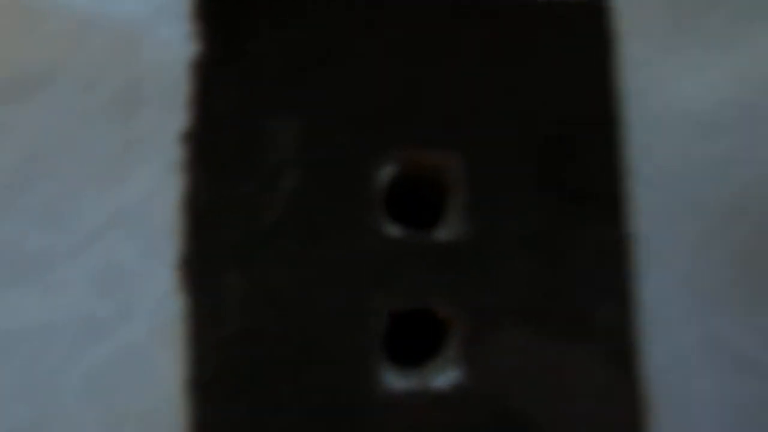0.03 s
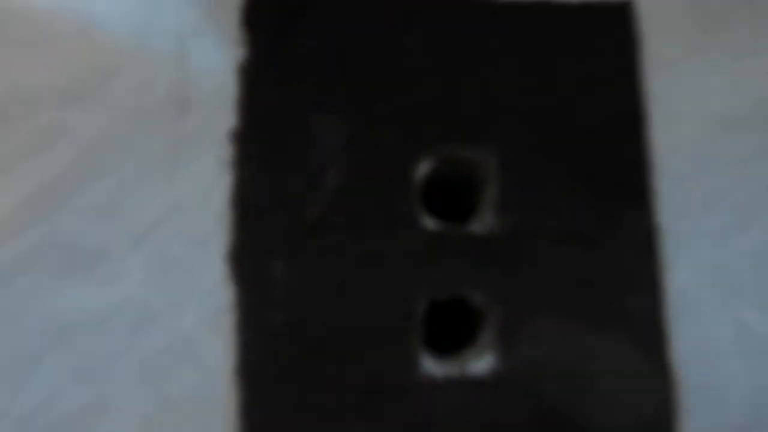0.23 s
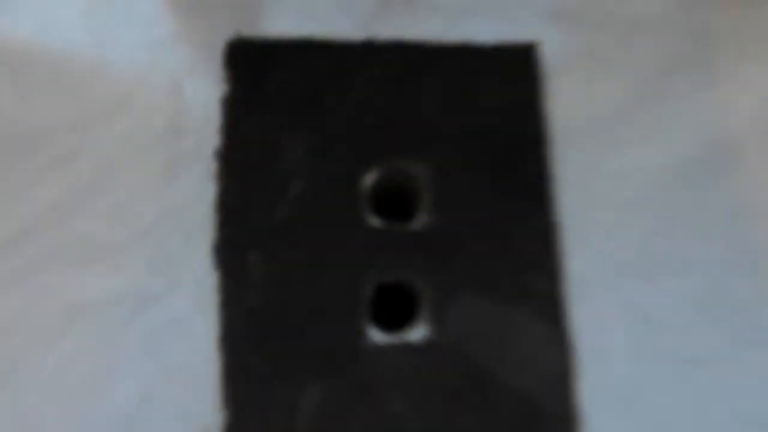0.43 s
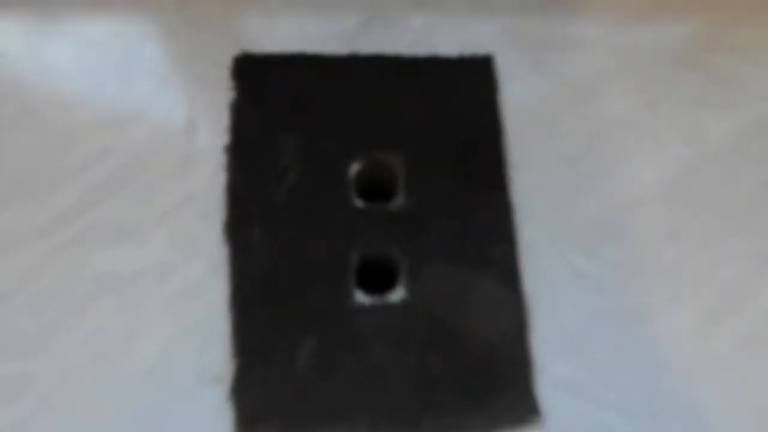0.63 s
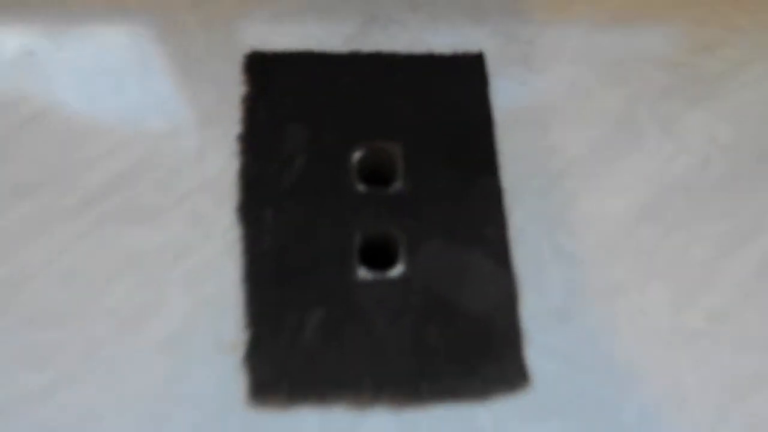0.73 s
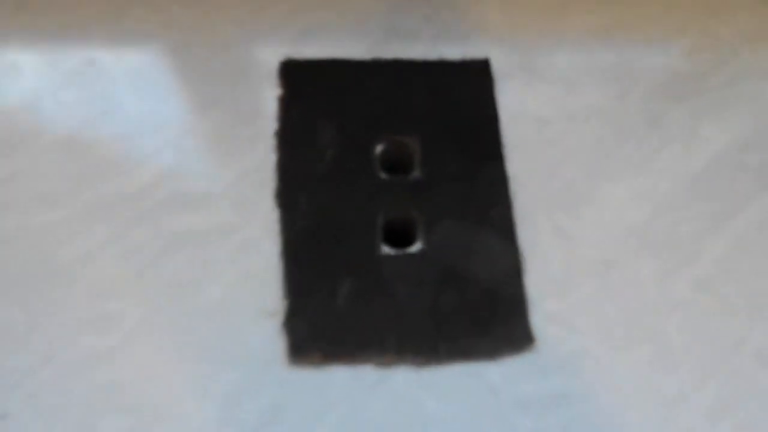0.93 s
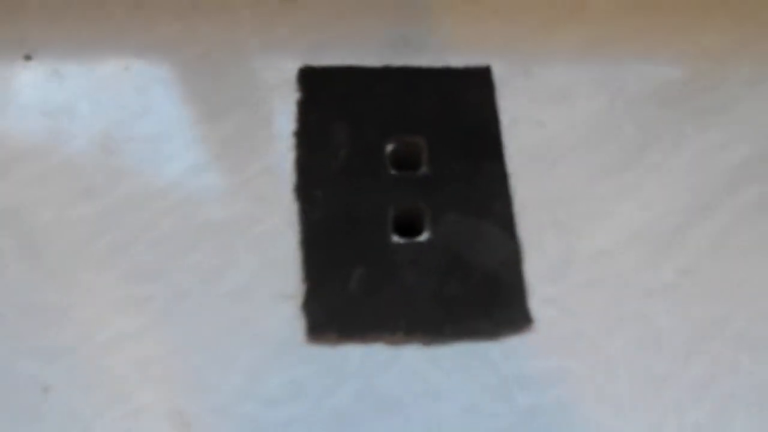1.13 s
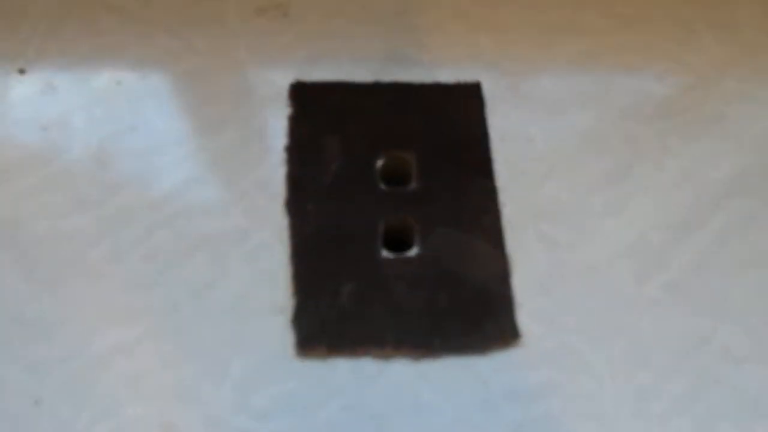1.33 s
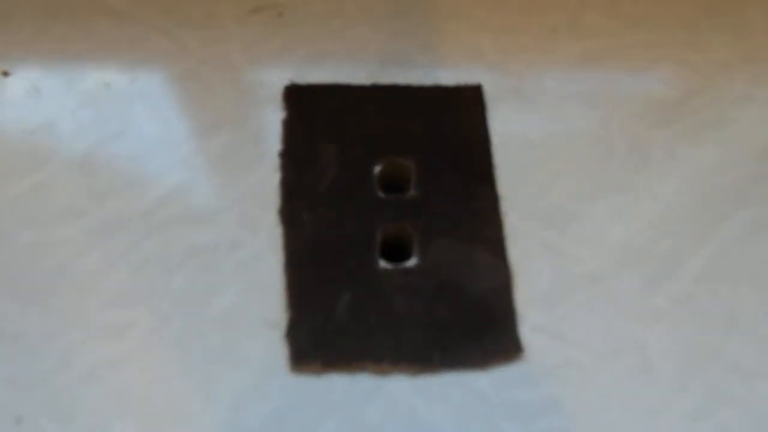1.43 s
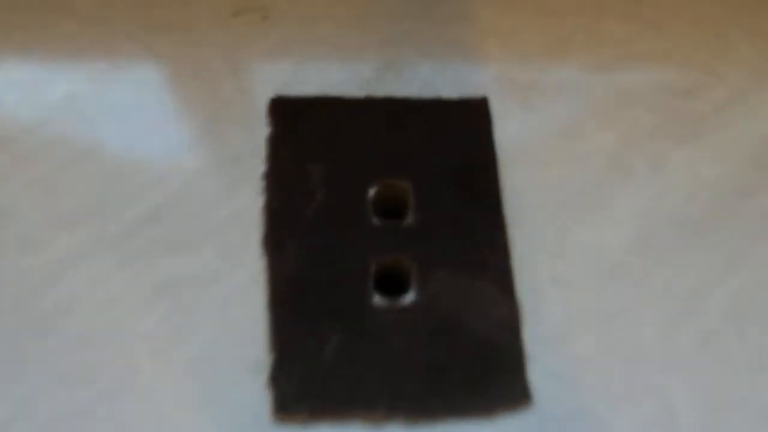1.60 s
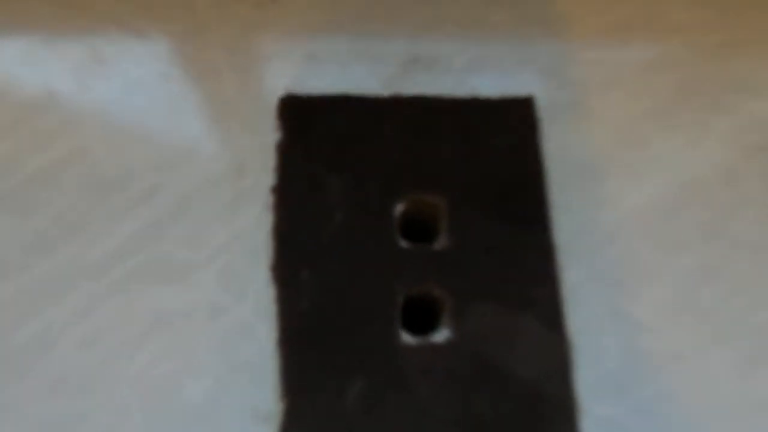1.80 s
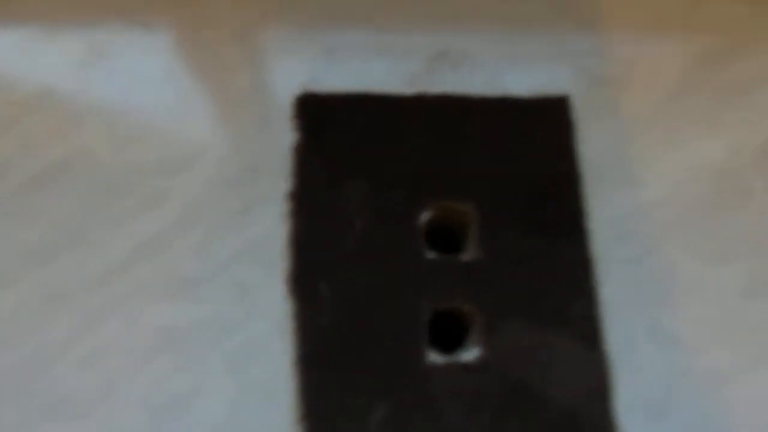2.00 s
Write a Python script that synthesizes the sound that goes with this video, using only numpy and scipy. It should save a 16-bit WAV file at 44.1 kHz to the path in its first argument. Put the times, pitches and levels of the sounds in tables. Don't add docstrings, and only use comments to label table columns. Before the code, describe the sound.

Bellows air rushes from a small hole, blasting roughly into a close stereo microphone mid-stroke

```python
import sys
import numpy as np
from scipy import signal
from scipy.fft import rfft, irfft
from scipy.io import wavfile
from scipy.ndimage import uniform_filter1d, minimum_filter1d

SR = 44100
rng = np.random.default_rng(int(sys.argv[2]) if len(sys.argv) > 2 else 0)


def dump(signal):
    limited = np.clip(np.atleast_2d(signal).T, -1, 1)
    pcm = np.round(limited * 32767).astype(np.int16)
    wavfile.write(sys.argv[1], SR, pcm)


def elevation(decibels):
    levels = np.asarray(decibels, float)
    return 10 ** (levels / 20)


N = 90625
HZ = np.fft.rfftfreq(N, 1 / SR)
T = np.arange(N) / SR

# start_s, hiss_db, chamber_rumble_db, mid_lift_db
AIR_FLOW = [(0, -25, -45, -0.5), (.12, -20, -38, 1), (.2, -22.5, -40.5, -0.5), (.235, -33, -34.5, -1),
            (.311, -46.5, -56, 3), (.317, -47, -32.5, 23.5), (.4, -42, -31, 9.5), (.66, -38.5, -31.5, 4.5),
            (.76, -45, -30, 10.5), (.81, -50, -36.5, 12), (1.2, -46, -74, -6.5), (1.47, -52, -66, 3.5),
            (1.61, -79.5, -61, 13), (1.645, -50.5, -69, 0.5), (1.705, -45.5, -33, 3.5),
            (1.72, -29, -27, 6.5), (1.85, -23.5, -30.5, -4), (2.055, -20.5, -47, -3.5)]
# frequency_hz, level_db (per Hz)
JET_COLOUR = [(120, -72), (200, -17), (659, -5.5), (722, -6), (7970, -9), (16000, -9.5)]


def unit(x):
    return x / np.sqrt(np.mean(x ** 2))


def noise():
    return rng.standard_normal(N)


def slope(table):
    f, v = np.array(table, float).T
    return np.interp(np.log(HZ + 1), np.log(f), v)


def bumps(table, lift_db=0):
    return sum((lift_db + db) / (1 + (2 * (HZ - f) / width_hz) ** 2) for f, width_hz, db in table)


def colour(x, db):
    return irfft(rfft(x) * elevation(db), N)


def split(x, hz):
    upper = 1 / (1 + (hz / (HZ + 1)) ** 6)
    return irfft(rfft(x) * (1 - upper), N), irfft(rfft(x) * upper, N)


def curve(table, column):
    rows = np.array(table, float)
    return np.interp(T, rows[:, 0], rows[:, column])


def walk(rate_hz):
    hold = int(SR / rate_hz)
    stairs = np.repeat(rng.standard_normal(N // hold + 1), hold)
    return unit(uniform_filter1d(uniform_filter1d(stairs, hold), hold)[:N])


def gate(start_s, length_s, edge_s):
    rise = np.clip((T - start_s) / edge_s, 0, 1)
    fall = np.clip((start_s + length_s - T) / edge_s + 1, 0, 1)
    return rise * fall


def ports():
    # frequency_hz, correlation
    likeness = [(100, 1), (1000, .95), (2200, 0.84), (4500, 0.64)]
    # frequency_hz, left_minus_right_db
    balance = [(100, 2), (5000, -2.5), (14000, 1)]
    alike = np.clip(slope(likeness), 0, .999)
    mid = rfft(noise()) * np.sqrt((1 + alike) / 2)
    side = rfft(noise()) * np.sqrt((1 - alike) / 2)
    lean = elevation(slope(balance) / 2)
    return np.array([irfft((mid + side) * lean, N), irfft((mid - side) / lean, N)])


def hiss():
    # centre_hz, width_hz, level_db
    hole_early = [(2280, 83, -3.5), (4440, 170, -0.5), (6360, 970, -4), (8030, 1900, -3),
                  (11500, 400, -3.5), (13500, 520, -5)]
    hole_late = [(2230, 270, -2.5), (6750, 180, -3.5)]
    # centre_hz, width_hz, level_db
    housing_dips = [(5150, 500, -13), (9600, 500, -10), (12900, 400, -8)]
    air = ports()
    base_db = slope(JET_COLOUR) + bumps(housing_dips)
    early_air = unit(colour(air, base_db + bumps(hole_early, lift_db=8.0)))
    late_air = unit(colour(air, base_db + bumps(hole_late, lift_db=9.0)))
    late = np.clip((T - 1) / 1.2, 0, 1)
    spectrum = rfft((1 - late) * early_air + late * late_air)

    flutter_db = 3 * np.cos(2 * np.pi * 14.35 * (T - 0.467)) * gate(0.33, 0.43, 0.016)
    swell_db = .3 * walk(17)
    out = 0
    for octave in np.arange(6, 15):
        share = np.clip(1 - abs(np.log2(HZ + 1) - octave), 0, 1)
        lift_db = curve(AIR_FLOW, 3) * np.exp(-((octave - 11.2) / 1.15) ** 2)
        out = out + irfft(spectrum * share, N) * elevation(lift_db + swell_db + walk(25))
    return out * elevation(curve(AIR_FLOW, 1) + flutter_db + 3.0)


def chamber():
    # frequency_hz, level_db (per Hz)
    chamber_colour = [(60, -40), (250, -3.5), (350, 1), (600, -5), (1000, -8), (2000, -18), (5000, -25)]
    return unit(colour(ports(), slope(chamber_colour))) * elevation(curve(AIR_FLOW, 2) + 3.1 * walk(40.67))


def valve():
    # start_s, level_db, length_s, ring_hz
    slaps = [
        (0.315, -29.5, 0.01, 2960),
        (1.713, -14, 0.022, 3140),
        (2.012, -22, 0.068, 2310),
    ]
    # centre_hz, width_hz, level_db
    slap_ring = [(4560, 110, 2), (8750, 200, -7), (10080, 1800, -4)]
    out = 0
    for start_s, db, length_s, ring_hz in slaps:
        ring_db = bumps([(ring_hz, 400, 0)] + slap_ring, lift_db=19.0)
        spit = unit(colour(ports(), slope(JET_COLOUR) + ring_db))
        fade_db = -5.5 * np.clip((T - start_s) / length_s, 0, 2)
        out = out + elevation(db) * spit * gate(start_s, length_s, 0.0028) * elevation(fade_db)
    return out


def boards():
    # start_s, level_db, pitch_hz
    knocks = [(0.338, -14.5, 433), (0.352, -27, 463), (0.359, -12.5, 468), (.366, -20, 624),
              (.419, -19.5, 485), (.492, -22, 420), (1.723, -16.5, 503), (1.805, -12, 502),
              (1.813, -19, 1040), (1.823, -15, 416), (1.835, -11.5, 646)]
    t60_s, rise_s = 0.046, 0.00086
    out = 0
    for start_s, db, pitch_hz in knocks:
        age = np.clip(T - start_s, 0, None)
        envelope = elevation(db - 60 * age / t60_s) * (1 - np.exp(-age / rise_s))
        out = out + envelope * np.sin(2 * np.pi * pitch_hz * age)
    return out * np.array([[1.06], [.94]])


def steady(x, size):
    envelope = np.sqrt(uniform_filter1d(uniform_filter1d(x ** 2, size), size) + 1e-12)
    return unit(x / envelope ** 0.64)


def wind(flow, eddies, snaps):
    # frequency_hz, level_db (per Hz)
    buffet_colour = [(80, -12.5), (170, -8), (280, 2.5), (450, 0.5), (700, -0.5), (1100, -14.5),
                     (2500, -70)]
    crackle_colour = [(400, -42), (800, 0), (1300, -3.5), (2000, -8.5), (3500, -24), (6000, -32.5),
                      (15000, -57)]
    snap_colour = [(700, -24), (1300, 3.5), (3500, -17.5), (6000, -31.5), (15000, -58)]
    band_trims = [-14, -10.5, -5.5, -17.5]
    trims_db = np.array(band_trims)[:, None]
    treble_shares = np.array([0, 0.44, 0.53, 1])[:, None]
    widths_s = np.array([0.0046, 0.0046, 0.0027, 0.0027])[:, None]

    kick_size = elevation(3.5 * rng.exponential(size=N)) * rng.standard_normal(N)
    struck = rng.random(N) < 900 / SR
    kicks = unit(struck * kick_size + 0.16 * noise())

    power = elevation(2 * (curve(flow, 1) + 3.3 * walk(160) + treble_shares * curve(flow, 2)))
    swirl = 0
    phase = 2 * np.pi * rng.random() + .8 * walk(150)
    for s, db, treble_db, swirl_hz in eddies:
        age = np.where(T < s, (T - s) / 0.5, T - s)
        band_db = db + trims_db + treble_shares * treble_db
        power = power + elevation(2 * band_db) * np.exp(-(age / widths_s) ** 2)
        swirl = swirl + elevation(db - 3) * np.exp(-(age / 0.0045) ** 2) * np.sin(2 * np.pi * swirl_hz * T + phase)
    snap_gain = sum(elevation(db + 0.5) * np.exp(-((T - s) / 0.0017) ** 2) for s, db in snaps)

    buffet = steady(colour(0.37 * kicks + noise(), slope(buffet_colour)), size=300)
    thud, body = split(buffet, 566)
    mid, crackle = split(colour(kicks, slope(crackle_colour)), 1380)
    thud_gain, body_gain, mid_gain, crackle_gain = np.sqrt(power)
    out = thud * thud_gain + elevation(6.0) * body * body_gain
    out = out + elevation(-1) * steady(mid, size=200) * mid_gain
    out = out + elevation(-4) * steady(crackle, size=120) * crackle_gain
    return out + swirl + snap_gain * steady(colour(noise(), slope(snap_colour)), size=60)


def hoots():
    # start_s, length_s, level_db, start_hz, end_hz
    hoot_events = [
        (1.883, 0.042, -31.5, 660, 672),
        (1.948, 0.026, -26.5, 1128, 1072),
        (2.015, 0.035, -12, 782, 706.5),
        (2.024, .04, -24, 973, 982),
    ]
    out = 0
    for start_s, length_s, db, from_hz, to_hz in hoot_events:
        glide = np.clip((T - start_s) / length_s * 2, 0, 1)
        pitch_hz = (from_hz + (to_hz - from_hz) * glide) * (1 + .005 * walk(120))
        envelope = elevation(db + .6 * walk(90)) * gate(start_s, length_s, .003)
        out = out + np.sqrt(2) * envelope * np.sin(2 * np.pi * np.cumsum(pitch_hz) / SR)
    return out


def scene():
    # start_s, level_db, treble_share_db
    wind_left = [(.68, -40, -17), (.7, -10.5, -55), (.86, -17.5, -9.5), (.96, -18.5, -28), (1.08, -23, -50),
                 (1.15, -37, -71), (1.3, -53, -63), (1.6, -44.5, -53), (1.68, -54, -34)]
    wind_right = [(.66, -38, -36), (.72, -20, -55), (.88, -21.5, -39), (.97, -15, -14.5), (1.14, -14, -15),
                  (1.28, -17, -20.5), (1.46, -17.5, -47.5), (1.58, -28, -84), (1.66, -49, -45)]
    # peak_s, level_db, treble_share_db, swirl_hz
    eddies_left = [(0.703, -3.5, -16, 440), (0.724, -16, -28, 304), (0.732, -2.5, -26, 460),
                   (0.747, -22, -31, 304), (0.764, -1, -16, 447), (0.78, 4, -26, 438.5),
                   (0.827, -2.5, -20, 422.4), (0.843, -0.5, -19, 392.7), (0.876, -5, -29, 434),
                   (0.89, -6, -27, 360), (0.902, -16, -24, 566), (0.913, -8, -27, 391.5),
                   (0.926, -8, -25, 425), (0.941, -6, -22, 290), (0.968, -11, -36, 555),
                   (0.977, -3.5, -27, 609.6), (1.038, -15, -29, 420), (1.052, 2, -35, 446.4),
                   (1.066, -11, -28, 438), (1.074, -19, -26, 314), (1.092, -12, -29, 375),
                   (1.109, -13, -45, 322), (1.132, -22, -36, 346), (1.159, -23, -22, 280),
                   (1.252, -18, -23, 573), (1.371, -17, -37, 368), (1.505, -17.5, -41, 450)]
    eddies_right = [(0.696, -20, -20, 379), (0.709, -25, -23, 304), (0.727, -21, -33, 302),
                    (0.756, -9, -28, 740), (0.779, -2.5, -26, 338.8), (0.798, -23, -40, 268),
                    (0.813, -10, -32, 261), (0.829, -2.5, -35, 261.3), (0.837, -2, -18, 670),
                    (0.871, -11, -14, 428), (0.896, -6.5, 7, 880), (0.915, -3.5, -10, 639),
                    (0.927, -6.5, -4, 549), (0.949, -6, -21, 433), (0.963, -9, -23, 528),
                    (0.973, 0, -27, 690), (1.022, -2.5, -6, 746), (1.044, -2.5, -10, 780),
                    (1.076, -7, -15, 823), (1.084, -6, -19, 308.2), (1.101, -7, -31, 316.7),
                    (1.125, -3, -9, 359), (1.138, -4, -17, 600), (1.166, -7, -20, 559),
                    (1.194, -7, -24, 543), (1.211, -2.5, -16, 501), (1.234, -6, -16, 531),
                    (1.248, -4, -31, 527), (1.261, -7.5, -2, 540), (1.271, -3, -8, 460.4),
                    (1.297, -2, -17, 299.6), (1.31, -10, -17, 340), (1.328, -16, -33, 420),
                    (1.346, -2.5, -27, 537.5), (1.36, -2.5, -11, 535.6), (1.4, -7, -5.5, 564),
                    (1.427, 1, -55, 334.8), (1.452, -13, -31, 443), (1.484, -2, -17.5, 460),
                    (1.496, -3, -32, 380), (1.531, -11.5, -27, 315.6), (1.551, -10, -29, 520),
                    (1.583, -18, -50, 340), (1.605, -26, -40, 510)]
    # peak_s, level_db
    snaps_left = [(0.699, -20.5), (0.728, -24), (0.762, -24), (0.774, -32), (0.784, -5.5), (0.83, -14.5),
                  (0.845, -14), (0.868, -14), (0.882, -23), (0.9, -29), (0.908, -13), (0.941, -24),
                  (0.974, -28)]
    snaps_right = [(0.837, -20), (0.896, -13), (0.92, -15), (0.928, -18), (0.976, -31), (0.98, -25),
                   (0.999, -20), (1.017, -14.5), (1.027, -16.5), (1.043, -12), (1.052, -14.5),
                   (1.058, -13.5), (1.068, -15), (1.076, -20), (1.089, -15), (1.098, -23), (1.115, -16),
                   (1.124, -16.5), (1.134, -25), (1.139, -18), (1.156, -35), (1.212, -18.5), (1.233, -29),
                   (1.259, -27), (1.27, -23), (1.288, -23), (1.347, -29), (1.359, -27.5), (1.426, -32.5),
                   (1.496, -30)]
    left = wind(wind_left, eddies_left, snaps_left)
    right = wind(wind_right, eddies_right, snaps_right)
    return hiss() + chamber() + valve() + boards() + np.array([left, right]) + hoots()


def top_cut(x):
    return signal.sosfilt(signal.butter(12, 17060, fs=SR, output="sos"), x)


def record(dry):
    x = signal.sosfilt(signal.butter(3, 152.5, "high", fs=SR, output="sos"), dry)
    duck = minimum_filter1d(1 / np.maximum(abs(x), 1), size=161)
    x = x * uniform_filter1d(duck, size=80)
    x = signal.sosfilt(signal.ellip(12, .2, 70, 15720, fs=SR, output="sos"), x)
    return top_cut(np.clip(x, -1, 1))


dry = scene()
out = record(dry)
dump(out)
```